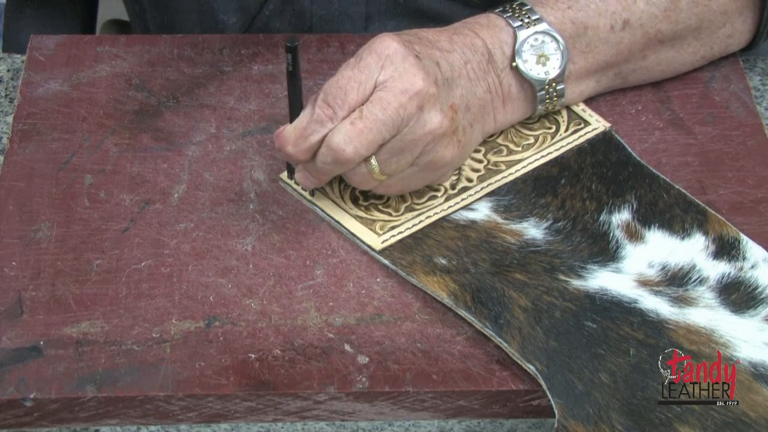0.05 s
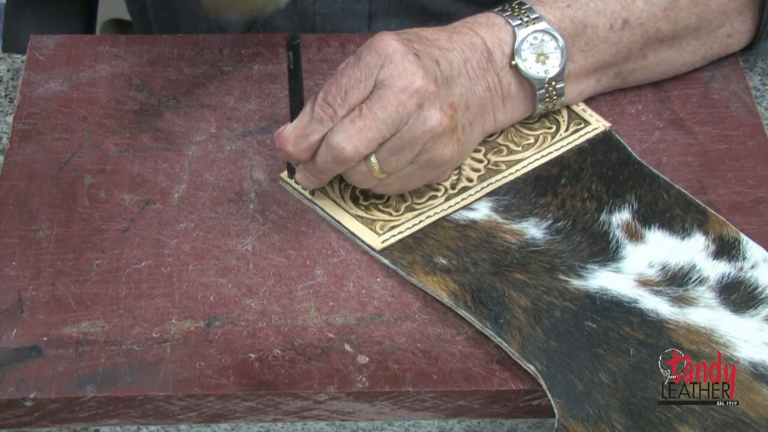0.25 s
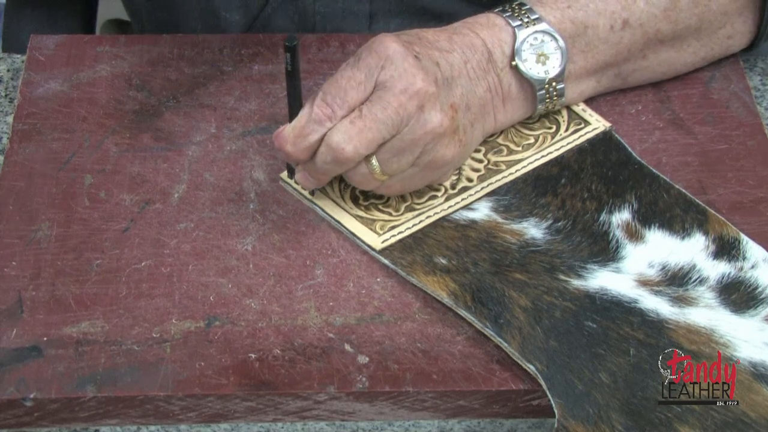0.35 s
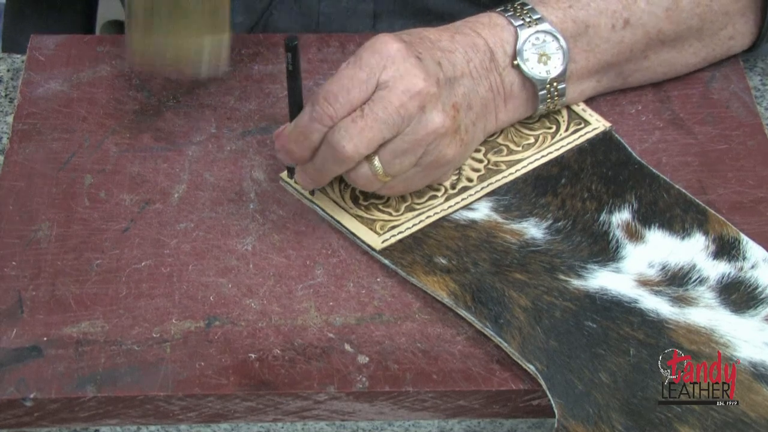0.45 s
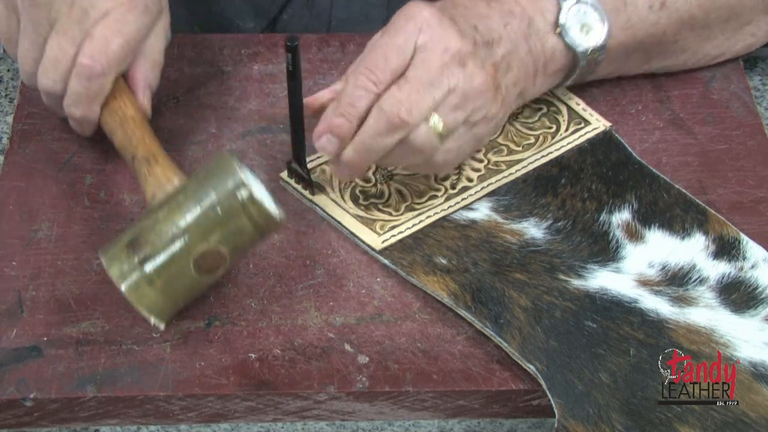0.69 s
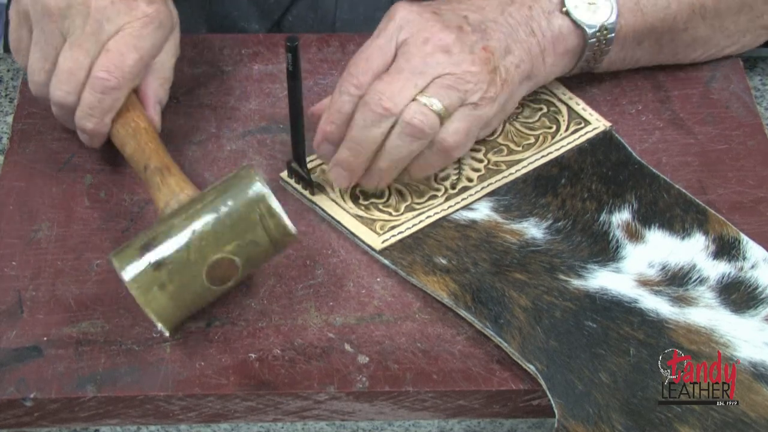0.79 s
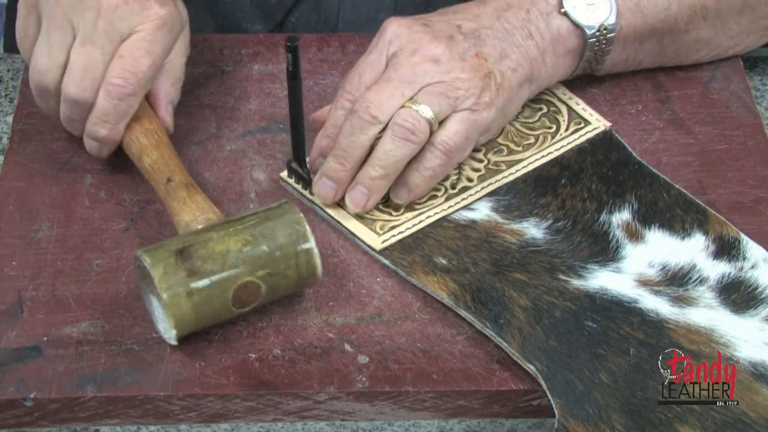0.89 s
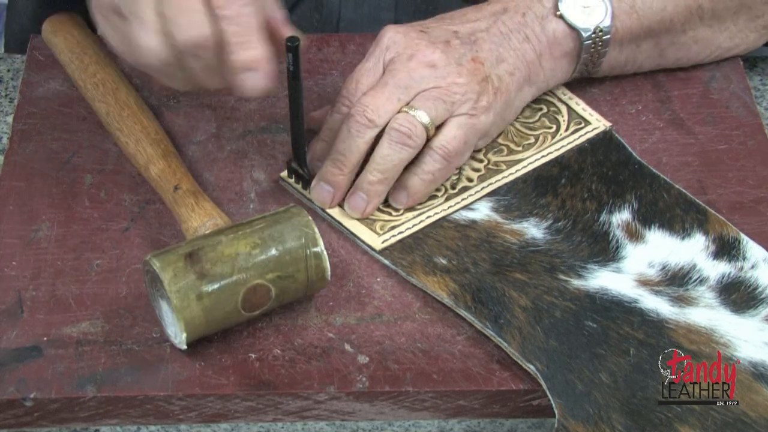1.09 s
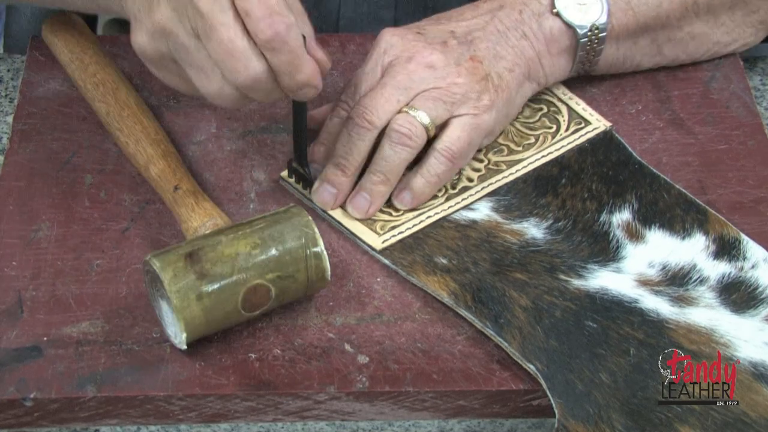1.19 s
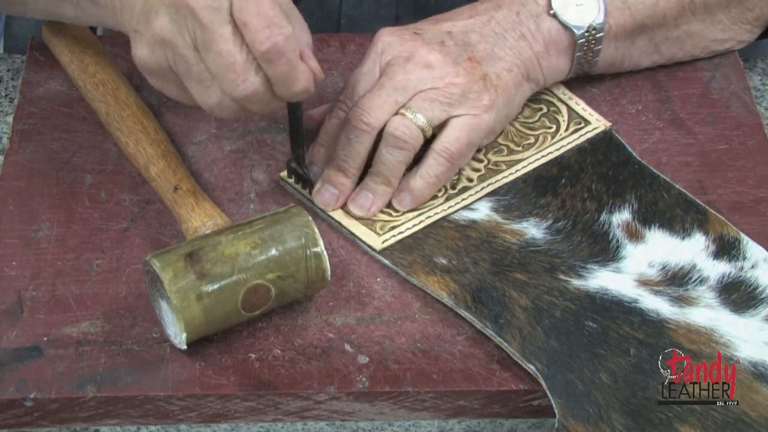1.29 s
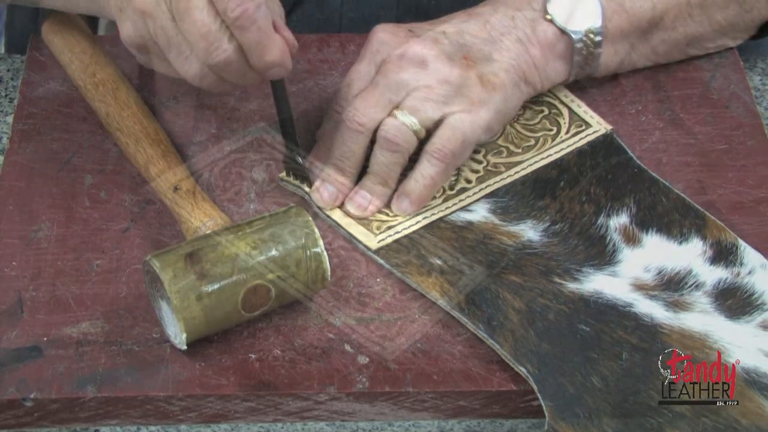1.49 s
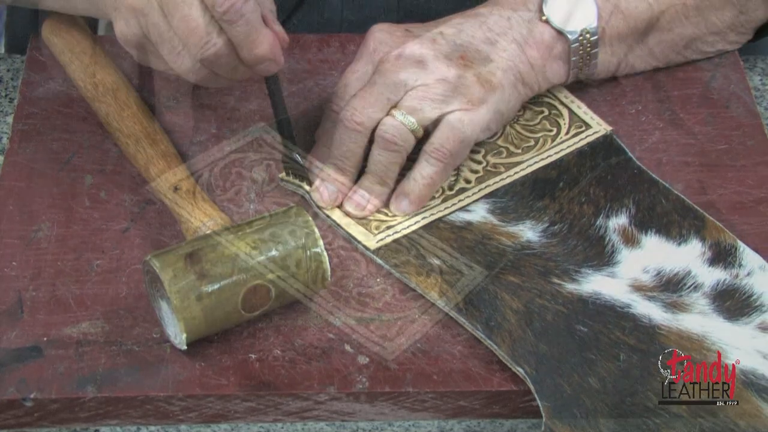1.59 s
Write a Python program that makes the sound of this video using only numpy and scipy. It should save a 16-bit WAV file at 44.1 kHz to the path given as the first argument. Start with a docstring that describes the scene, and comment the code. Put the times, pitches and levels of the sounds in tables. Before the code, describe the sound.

A mallet strikes a steel stamp on leather at about 0.2 seconds, a sharp, quickly damped knock with a short workshop echo. Near 0.8 seconds the mallet softly touches a wooden board. Its head knocks down loudly just before 1 second, followed at once by the handle's clack and a brief rattle. A low rumble swells from about 1.1 seconds. Everything sounds close and on the left only.

```python
"""A mallet strikes a steel stamp held on leather, in a small workshop still ringing from the blow before.
The mallet is then laid on a wooden board: its head touches softly and knocks down, and the handle
drops and rattles. Each knock is a few fading tones plus a burst of noise, followed by the room's echo.
One close microphone, on the left channel only, overloads on the loudest hits."""
import sys
import numpy as np
from scipy import signal
from scipy.fft import rfft, irfft, next_fast_len
from scipy.io import wavfile

SR = 44100
rng = np.random.default_rng(int(sys.argv[2]) if len(sys.argv) > 2 else 0)


def transcribe(u):
    """Save the signal u as a 16-bit wav file named by the first command-line argument.

    u: samples, shape (n,) or (channels, n), limited to [-1, 1]; the rate is SR.
    q: integer samples, one column per channel.
    """
    v = np.clip(np.atleast_2d(u).T, -1, 1)
    q = np.round(v * 32767).astype(np.int16)
    wavfile.write(sys.argv[1], SR, q)


N = 72765
LEAD = SR // 2  # samples before time zero, so an earlier blow can still ring


def amp(db):
    """Turn decibels into a number to multiply by."""
    return 10 ** (np.asarray(db) / 20)


def along(points, hz):
    """Read between (frequency, value) points, spacing frequencies by octaves."""
    freqs, values = np.transpose(points)
    return np.interp(np.log(hz + 1), np.log(freqs + 1), values)


def filtered(x, response):
    """Scale each frequency in x by response(hz)."""
    n = x.shape[-1]
    padded = next_fast_len(n + 8192)
    return irfft(rfft(x, padded) * response(np.fft.rfftfreq(padded, 1 / SR)), padded)[..., :n]


def dull(x, hz):
    """Gently turn down everything above hz."""
    return signal.sosfilt(signal.butter(1, hz, fs=SR, output="sos"), x)


def noise(spectrum, size):
    """Noise of strength (rms) 1, coloured by a table of frequencies and levels."""
    x = filtered(rng.standard_normal(size), lambda hz: amp(along(spectrum, hz)))
    return x / x.std()


def room(x, colour, reverb_db, walls_db):
    """Add dull wall echoes to a hit, and reverb: a wash of noise whose treble dies first."""
    # how long the reverb takes to fade by 60 dB: f/Hz, t60/s
    fade_times = [(100, .5), (450, .56), (800, .42), (2500, .46), (5000, .43), (9500, .36), (14000, .26)]
    # echoes from nearby surfaces: delay/s, level/dB
    walls = [(.0062, -21.5), (.0112, -23.5), (0.025, -17), (.0635, -30)]
    hz, t, bands = signal.stft(noise(colour, SR * 3 // 4), SR, nperseg=256)
    fade = amp(-60 * t / along(fade_times, hz)[:, None])
    tail = signal.istft(bands * fade, SR, nperseg=256)[1]
    build_up = 1 - np.exp(-(np.arange(len(tail)) / SR / .005) ** 2)  # takes about 5 ms
    out = amp(reverb_db) * tail * build_up
    out[:len(x)] += x
    echo = dull(dull(x, hz=2210), hz=2210)
    for delay, db in walls:
        out[round(delay * SR):][:len(x)] += amp(db + walls_db) * echo
    return out


def hits(events, tones, crack, reverb, crack_db, crack_t60, attack_s, reverb_db, walls_db):
    """Each hit rings the tones and makes a crack of noise; t60 is the time to fade by 60 dB."""
    track = np.zeros(LEAD + N)
    t = np.arange(SR // 4) / SR
    ring = sum((-1) ** k * amp(db - 60 * t / t60) * np.sin(2 * np.pi * hz * t)
               for k, (hz, db, t60) in enumerate(tones))
    attack = 1 - np.exp(-t / attack_s)
    for start_s, db, treble_db in events:
        burst = amp(crack_db - 60 * t / crack_t60) * noise(crack, len(t))
        hit = room((ring + burst) * attack, reverb, reverb_db, walls_db)
        body = dull(hit, hz=2500)
        treble = amp(treble_db) * (hit - body)
        slot = track[LEAD + round(start_s * SR):][:len(hit)]
        slot += amp(db) * (body + treble)[:len(slot)]
    return track[LEAD:]


def background():
    """Steady workshop air, a faint hum and a low rumble that swells near the end."""
    # colours of the air and the rumble: f/Hz, level/dB
    air_colour = [(20, -6), (55, 0), (100, -5), (290, 1), (450, -1), (600, -7), (1000, -12), (1400, -9),
                  (1800, -16), (4500, -22), (9000, -31), (15000, -37)]
    rumble_colour = [(20, -6.5), (60, -7.5), (110, -9), (280, -3), (450, -11.5), (700, -17.5), (1200, -2)]
    # the rumble's rise: t/s, level/dB
    rumble_levels = [(0, -73), (.7, -73.5), (1.1, -51.5), (1.4, -33), (1.65, -35)]
    air_db, hum_db, hum_hz, rumble_top_hz = -63.5, -68, 58, 1000
    t = np.arange(N) / SR
    hum = amp(hum_db) * np.sin(2 * np.pi * hum_hz * t)
    rumble = filtered(noise(rumble_colour, N), lambda hz: 1 / (1 + (hz / rumble_top_hz) ** 2))
    swell = amp(np.interp(t, *np.transpose(rumble_levels)))
    return amp(air_db) * noise(air_colour, N) + hum + swell * rumble


def ticks():
    """Shifting fingers, and light grazes just before a hit, make dry ticks with no ringing tones."""
    # the ticks: t/s, level/dB, treble/dB
    events = [(.2163, -23, 0.5), (.687, -50, -0.5), (.769, -53, -4.5), (.897, -51, -6), (.937, -50, -2),
              (.9992, -35.5, -1.5), (1.029, -59, -13)]
    # colour of a tick and its reverb: f/Hz, level/dB
    colour = [(200, -12), (1400, -6), (2200, -9), (3500, 0), (4800, -10), (6000, -12), (10000, -25),
              (15000, -40)]
    return hits(events, [], colour, colour,
                crack_db=-4, crack_t60=.025, attack_s=.0005, reverb_db=-27, walls_db=-1)


def soft_touches():
    """The mallet brushes the wooden board, which answers with low, soft taps."""
    # the touches: t/s, level/dB, treble/dB
    events = [(.7695, -33, 6.5), (.8005, -38, -4), (.813, -47.5, -9)]
    # ringing of the board: f/Hz, level/dB, t60/s
    tones = [(138, -14.5, 0.055), (275, -5.5, .08), (358.5, -4.5, .1), (480, 2, 0.035), (1006, -12, .025),
             (1237, -1.5, .025)]
    # colour of a touch and its reverb: f/Hz, level/dB
    colour = [(80, 1), (400, 14), (1400, -6), (2400, -9), (4000, -33), (12000, -37)]
    return hits(events, tones, colour, colour,
                crack_db=4.5, crack_t60=.013, attack_s=.00069, reverb_db=-15.5, walls_db=-5)


def head_knocks():
    """The mallet's head knocks down on the board once loudly, then three times lightly."""
    # the knocks: t/s, level/dB, treble/dB
    events = [(.9562, 2, -3), (.9915, -23, -29), (1.0292, -21, -19), (1.0445, -24.5, -8)]
    # ringing of head and board: f/Hz, level/dB, t60/s
    tones = [(183, -38.5, 0.17), (365.7, -33.5, 0.33), (463, -20, 0.029), (637, -17, 0.028),
             (729, -9, 0.049), (1020, -6, 0.01), (1137, -11.5, 0.036), (1273, 1.5, 0.014),
             (1643, -39, 0.03), (1775, -12, 0.029), (2311, -8, 0.012), (4805, -23.5, 0.015)]
    # colours of the crack and the reverb: f/Hz, level/dB
    crack = [(60, -12), (400, -8.5), (1200, 9), (2400, 0.5), (3500, -15), (5000, -19), (8000, -43.5),
             (15000, -49.5)]
    reverb = [(50, -24), (250, -14), (450, -6), (700, 0), (900, -7), (1300, -5), (1800, -13), (2500, -27),
              (5000, -44), (12000, -62)]
    return hits(events, tones, crack, reverb,
                crack_db=-4.5, crack_t60=.015, attack_s=.00017, reverb_db=-32, walls_db=-5)


def handle_drop():
    """The handle falls on the board with a short wooden clack."""
    # the landing: t/s, level/dB, treble/dB
    events = [(1.0001, -9, 0)]
    # ringing of handle and board: f/Hz, level/dB, t60/s
    tones = [(141, -36, 0.09), (393, -19.5, 0.1), (498, -23.5, 0.059), (806, -10.5, 0.027),
             (1150, 2, 0.017), (1414, -9, 0.076), (1760, -4.5, .018), (1930, -6.5, 0.028),
             (2150, 2.5, 0.01), (3414, -14.5, 0.021)]
    # colours of the crack and the reverb: f/Hz, level/dB
    crack = [(60, -10), (600, -4), (1800, 0), (3400, -11), (4500, -22), (7500, -28), (10000, -38),
             (15000, -55)]
    reverb = [(50, -17), (150, -7), (260, -2), (400, 2), (560, -5), (800, -2), (1450, -1), (2000, -9),
              (2700, -16), (3450, -12), (5000, -32), (9500, -48), (15000, -62)]
    return hits(events, tones, crack, reverb,
                crack_db=-2.5, crack_t60=.013, attack_s=.00039, reverb_db=-25.5, walls_db=-7.5)


def stamp_blows():
    """The mallet hits the steel stamp hard, and the leather quickly stops the ringing."""
    # the blows, the first before time zero: t/s, level/dB, treble/dB
    events = [(-.125, -3, 8), (.218, -1, 1)]
    # ringing of stamp, mallet and bench: f/Hz, level/dB, t60/s
    tones = [(150.2, -22.5, 0.043), (328, -17, 0.073), (463, -8.5, .045), (548, -10, 0.054),
             (811, -13.5, .045), (920, -3.5, .04), (1218, -7.5, 0.038), (1500, -8, .028), (1876, -9, .025),
             (2361, 4.5, .016), (2583, -15, 0.041), (2686, -12, 0.022), (3276, -10, 0.015),
             (4033, -12.5, .02), (6060, -19, 0.017), (7400, -12, .009)]
    # colours of the crack and the reverb: f/Hz, level/dB
    crack = [(100, -10), (1000, 3), (2500, 9), (4500, -3.5), (7000, -1.5), (9000, -22.5), (12500, -17.5),
             (16000, -24.5)]
    reverb = [(50, -24), (130, -14), (250, -11), (450, -4), (650, -2), (900, 0), (1300, -9), (2500, -16),
              (3400, -22), (5000, -28), (7000, -32), (9500, -39), (15000, -49)]
    return hits(events, tones, crack, reverb,
                crack_db=-1.5, crack_t60=.013, attack_s=.00037, reverb_db=-23, walls_db=2.5)


def scene():
    """The microphone, weak in the deep bass, feeds the left channel; the right stays empty."""
    contacts = stamp_blows() + soft_touches() + head_knocks() + handle_drop() + ticks()
    bass_cut = signal.butter(2, 55, "high", fs=SR, output="sos")  # below 55 Hz
    left = signal.sosfilt(bass_cut, contacts) + background()
    return np.array([left, np.zeros(N)])


def record(dry):
    """The empty right input hisses, the loudest peaks are flattened and the highest treble is cut."""
    # colour of the hiss: f/Hz, level/dB
    hiss_colour = [(30, -20), (100, -8), (250, 1), (1500, 0), (15000, 0)]
    hiss_db, clip_hardness, top_hz = -78, 17, 16000
    x = dry + np.array([np.zeros(N), amp(hiss_db) * noise(hiss_colour, N)])
    clipped = x / (1 + np.abs(x) ** clip_hardness) ** (1 / clip_hardness)
    return filtered(clipped, lambda hz: np.clip((top_hz - hz) / 400 + .5, 0, 1))


dry = scene()
out = record(dry)
transcribe(out)
```